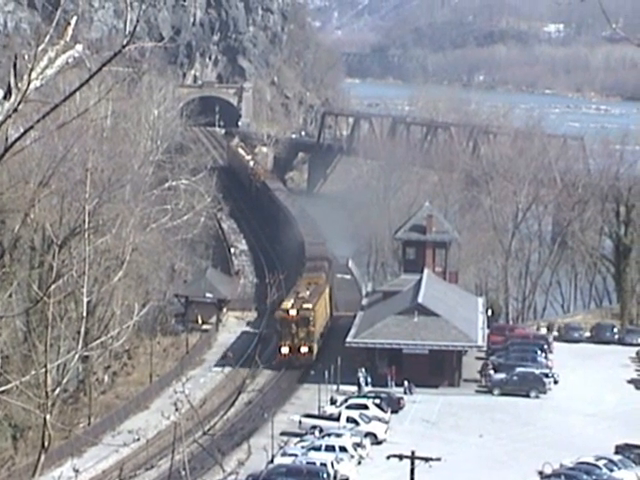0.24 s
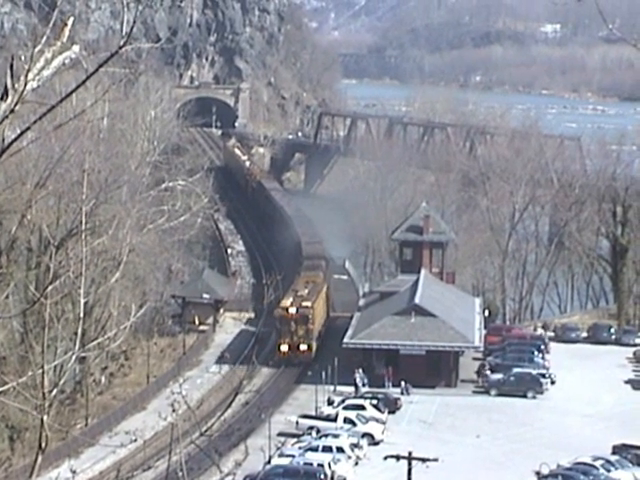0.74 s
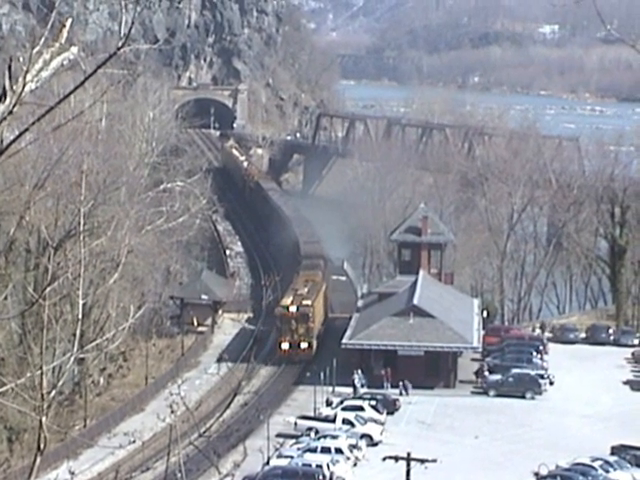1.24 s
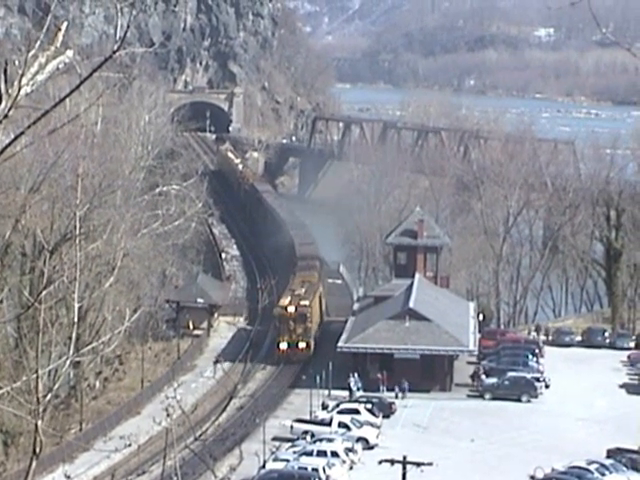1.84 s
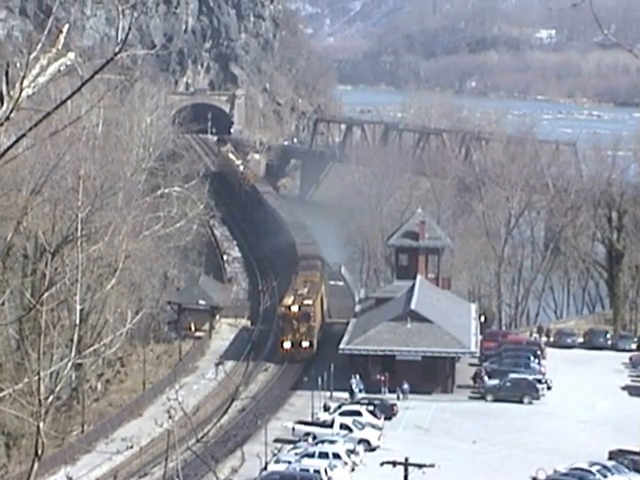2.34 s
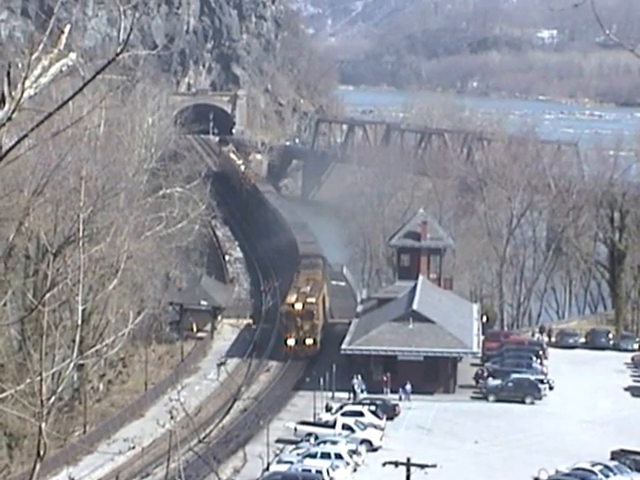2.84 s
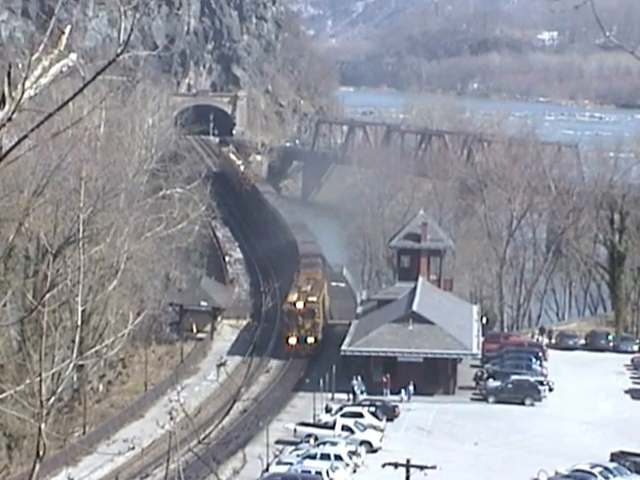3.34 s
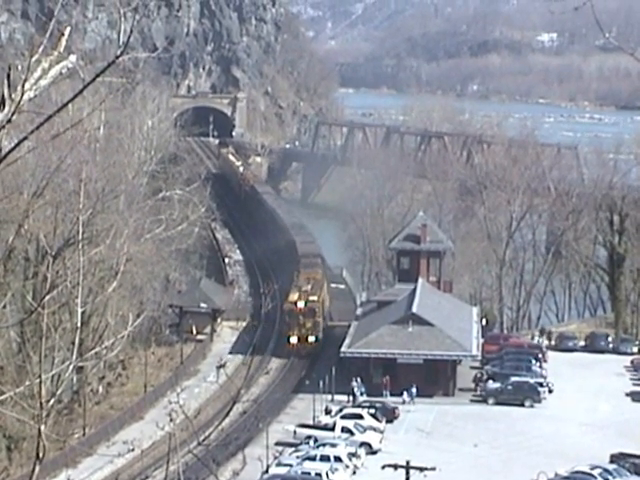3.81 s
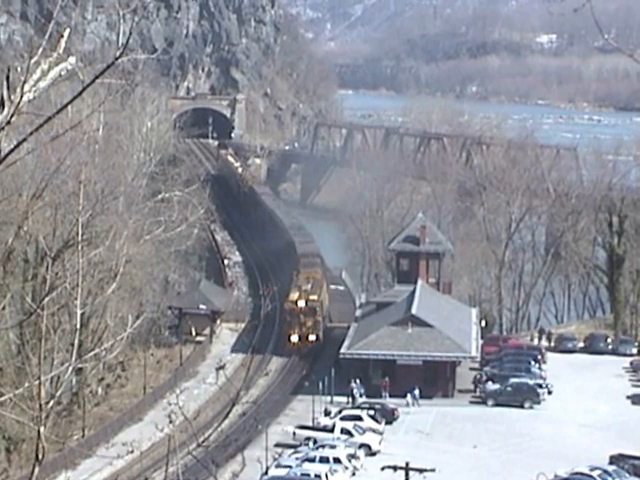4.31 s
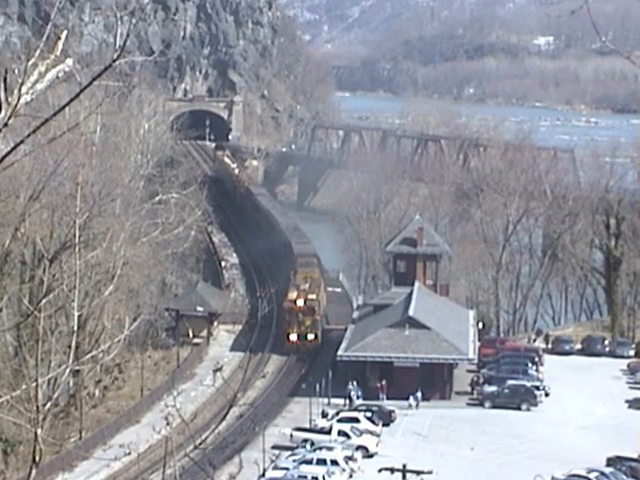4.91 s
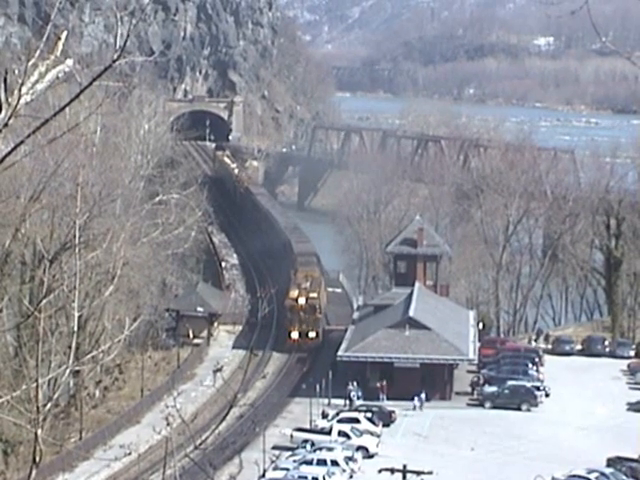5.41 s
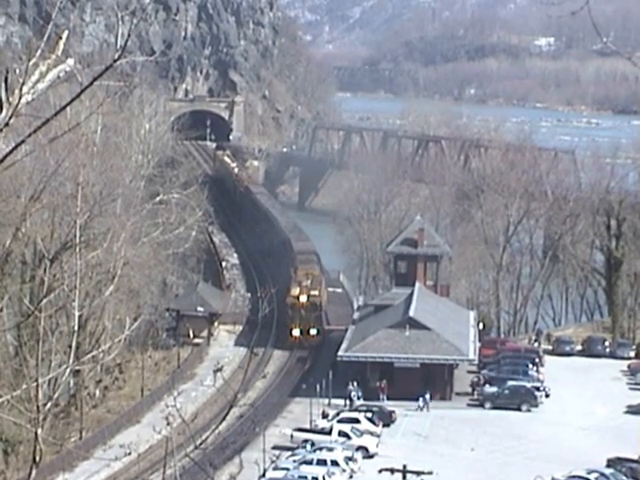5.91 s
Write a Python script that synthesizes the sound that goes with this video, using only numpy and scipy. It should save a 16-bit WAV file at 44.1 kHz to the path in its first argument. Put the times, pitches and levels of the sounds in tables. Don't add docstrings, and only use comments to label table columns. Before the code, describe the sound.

A continuous deep hum and rushing roar from a heavy train far below, slightly left of centre in the low end, swelling gently with the wind. A thin, constant high whine and hissy mechanism noise come from the camera itself, with sparse tiny clicks. Just before three seconds comes a crisp leaf scrape, then light gusts and short whistled bird chirps; the engine tones soften toward the end.

```python
import sys
import numpy as np
from scipy import signal
from scipy.fft import irfft
from scipy.io import wavfile

SR = 44100
rng = np.random.default_rng(int(sys.argv[2]) if len(sys.argv) > 2 else 0)


def elevation(decibels):
    levels = np.asarray(decibels, float)
    return 10 ** (levels / 20)


def digitize_waveform(pressure):
    field = np.atleast_2d(pressure).T
    bounded = np.clip(field, -1, 1)
    quanta = np.round(bounded * 32767).astype(np.int16)
    wavfile.write(sys.argv[1], SR, quanta)


N = 271215

# (frequency [Hz], left-right likeness [-1..1], left-right balance [dB])
STEREO_IMAGE = [(60, 0.97, 4.0), (300, 1, 4), (700, 0.94, 2.5), (1400, 0.96, 1.8), (3000, 0.99, -1),
                (6000, 0.29, 2.5), (15000, .05, -1.5)]


def in_time(rows):
    s, *columns = np.transpose(rows)
    return [np.interp(np.arange(N) / SR, s, c) for c in columns]


def at_hz(points, hz, column=1):
    points = np.array(points)
    return np.interp(np.log(hz), np.log(points[:, 0]), points[:, column])


def rms_one(x):
    return x / np.sqrt(np.mean(x ** 2) + 1e-20)


def drift(rate):
    step = 40
    r = np.exp(-2 * np.pi * step * rate / SR)
    white = rng.standard_normal(N // step + 4002)
    slow = signal.lfilter([1], [1, -2 * r, r * r], white)[4000:]
    return np.interp(np.arange(N) / step, np.arange(len(slow)), rms_one(slow - slow.mean()))


def bumps(rows):
    t, total = np.arange(N) / SR, 0
    for row in rows:
        peak, rise, fall, height = row[0], row[1], row[-2], row[-1]
        ramp = np.interp(t, [peak - rise, peak, peak + fall], [0, 1, 0])
        total = total + height * np.sin(np.pi / 2 * ramp) ** 2
    return total


def pan(x, lr_db, sign=1):
    return np.array([elevation(lr_db / 2) * x, sign * elevation(-lr_db / 2) * x])


def resonance(x, hz, width):
    r = np.exp(-np.pi * width / SR)
    return signal.lfilter([1, 0, -1], [1, -2 * r * np.cos(2 * np.pi * hz / SR), r * r], x)


def banded_noise(spectrum, first_hz, patchy_db, tilt_db, alike_share):
    edges = first_hz * 2 ** np.arange(0, np.log2(.42 * SR / first_hz), .5)
    opposite = np.array([[1], [-1]])
    out, together, white = 0, drift(8.4), rng.standard_normal((2, 2, N + SR))
    for k, (low, high) in enumerate(zip(edges, edges[1:])):
        band = signal.butter(2, [low, high], "band", fs=SR, output="sos")
        mid, side = signal.sosfilt(band, white[k % 2])[:, SR:]
        hz = np.sqrt(low * high)
        alike = np.clip(alike_share * at_hz(STEREO_IMAGE, hz), -1, 1)
        flicker_db = patchy_db * (1.7 * together + drift(9))
        gain = elevation(at_hz(spectrum, hz) + tilt_db * np.log2(hz / 1400) + flicker_db)
        lean = elevation(at_hz(STEREO_IMAGE, hz, column=2) / 2 * opposite)
        out = out + gain * lean * (np.sqrt(1 + alike) * mid + np.sqrt(1 - alike) * side * opposite)
    return rms_one(out)


def hiss():
    # (frequency [Hz], density [dB per Hz])
    hiss_spectrum = [(1500, -12), (3000, 7.5), (5000, -3), (8000, -5), (11000, -7.5), (15500, -8.5)]
    # (peak time [s], rise [s], fall [s], height [dB])
    gusts = [
        (2.8, 0.38, .4, 2.5),
        (3.45, 0.47, .5, 4),
        (4.45, 0.53, .17, 3.5),
    ]
    noise = banded_noise(hiss_spectrum, 1340.0, patchy_db=-0.1, tilt_db=0, alike_share=0.83)
    return elevation(-57 + bumps(gusts)) * noise


def rustles():
    # (time [s], length [s], lowest frequency [Hz], level [dB])
    bursts = [
        (2.695, .025, 4600, -58),
        (2.752, .014, 4200, -54),
        (2.772, .012, 3800, -53),
        (2.784, .02, 3800, -52),
        (2.81, .025, 6000, -58),
        (2.843, .016, 4500, -53),
    ]
    out, top_hz, size = np.zeros((2, N)), 8600, 4410
    for s, length, low_hz, level_db in bursts:
        grains = rng.standard_normal((2, size)) * elevation(3 * rng.standard_normal(size))
        band = signal.butter(3, [low_hz, top_hz], "band", fs=SR, output="sos")
        grains = signal.sosfilt(band, grains)
        shape = np.sin(np.pi * np.clip(np.arange(size) / SR / length, 0, 1))
        start = round(s * SR)
        out[:, start:start + size] += elevation(level_db) * rms_one(grains) * shape
    return out


def birds():
    # (time [s], length [s], pitch [Hz], drop into the pitch [Hz], level [dB])
    calls = [
        (2.70, 0.02, 5100, 50, -54.5),
        (3.216, 0.085, 7350, 800, -50.5),
        (3.585, 0.08, 7430, 0, -55),
        (3.675, .025, 7450, 50, -61),
        (3.745, .065, 5420, 30, -60.5),
        (3.782, 0.045, 3620, 50, -56.5),
        (5.115, 0.037, 3050, 0, -57),
    ]
    drop_s, attack_s, release_share = .005, .008, .75
    trill_per_s, trill_hz, trill_depth = 62, 140, .7
    out, size = np.zeros((2, N)), 8820
    t = np.arange(size) / SR
    echo_decay = .035 * np.exp(-np.arange(2600) / SR / 0.035)
    for s, length, end_hz, drop_hz, level_db in calls:
        trill = 2 * np.pi * trill_per_s * rng.uniform(0.7, 1.5) * t
        hz = end_hz + drop_hz * np.exp(-t / drop_s) + trill_hz * np.sin(trill)
        attack = np.clip(t / attack_s, 0, 1)
        release = np.clip((length - t) / (release_share * length), 0, 1)
        whistle = np.sin(2 * np.pi * np.cumsum(hz) / SR)
        call = attack * release * (1 + trill_depth * np.cos(trill)) * whistle
        start = round(s * SR)
        for side in (0, 1):
            echoes = rng.standard_normal(2600) * echo_decay
            echoes[2 * side] = 1
            out[side, start:start + size] += elevation(level_db) * signal.fftconvolve(call, echoes)[:size]
    return out


def ticks():
    # (time [s], peak [dB], left-right balance [dB])
    cracks = [(0.8839, -44, -1.5), (1.3603, -44, -2.0), (2.4728, -45, -1.0), (2.6294, -44, -0.5),
              (2.6894, -43, -0.5), (2.7561, -43, -1.0), (2.7751, -40, -0.5), (2.7894, -42, -0.5),
              (2.8479, -42, -1.0), (3.1073, -43, -1.0), (4.568, -41, -1.5), (5.2435, -42, -1.5),
              (5.79, -46, -1)]
    out, size = np.zeros((2, N)), 200
    fade = np.exp(-np.arange(size) / SR / .0008)
    band = signal.butter(3, [2200, 6000], "band", fs=SR, output="sos")
    for s, peak_db, lr_db in cracks:
        splinters = rng.standard_normal(size) + .6 * rng.standard_normal((2, size))
        crack = signal.sosfilt(band, fade * splinters)
        crack = crack / np.abs(crack).max() * pan(np.ones(1), lr_db)
        start = round(s * SR)
        out[:, start:start + size] += elevation(peak_db + 4.5) * crack
    return out


def drive_whine():
    # (centre [Hz], spacing [Hz], side tones each way [count], level [dB], left-right balance [dB])
    families = [(3016.5, 111.8, 3, -67, 1), (3167.4, 158.37, 3, -74, 2), (4156.8, 111.2, 1, -72, 0),
                (4220, 0, 0, -76, 2), (4544, 48.5, 1, -77, 2), (6454.8, 223.5, 3, -71, -9),
                (6343, 223.5, 3, -79, -9), (6395, 111.2, 1, -76, -9), (6493.5, 158.4, 4, -72, -9),
                (6810, 26.5, 1, -79, -8), (6651.5, 28, 1, -80, -8)]
    side_loss = {111.8: 1.8, 223.5: 2.8, 158.4: 2.2}
    t, out = np.arange(N) / SR, 0
    for centre_hz, spacing, count, db, lr_db in families:
        for k in range(-count, count + 1):
            level_db = db - abs(k) * side_loss.get(spacing, 0)
            angle = 2 * np.pi * (centre_hz + k * spacing) * t + 1.5 * drift(4)
            height = np.sqrt(2) * elevation(level_db - 1.5 + 1.5 * drift(4))
            lag = rng.uniform(1.2, 2.4) * np.array([[0], [1]])
            out = out + height * np.sin(angle + lag) * pan(np.ones(1), lr_db)
    return out


def drum_in_housing():
    # (frequency [Hz], width [Hz])
    modes = [(2500, 200), (3350, 500), (4100, 300), (5000, 900), (6400, 600), (7400, 350), (8400, 1200),
             (9850, 280), (11000, 1200), (13300, 2500)]
    # (bearing noise [dB], drum comb [dB], left-right balance [dB], left-right sign [clipped to
    mode_levels = [(-67, -81, -8.5, -1.1), (-68, -78, 4, -0.69), (-67, -66.5, -0.5, -1),
                   (-76, -71, 0, -1.3), (-72.5, -76, -7, -1.2), (-69.5, -76.5, -10.5, 0.091),
                   (-72.5, -77.5, -1, -1.1), (-75, -75, -3.5, -1.2), (-76, -72, 5, -0.33),
                   (-87.5, -75, 2, -.3)]
    drum_hz, out = 74.93, 0
    lines = elevation(3 * rng.standard_normal(206)) * np.exp(2j * np.pi * rng.random(206))
    pattern = irfft(lines, n=16384)
    drum = pattern[(drum_hz * (np.arange(N) / SR) % 1 * len(pattern)).astype(int)]
    for (hz, width), (noise_db, comb_db, lr_db, sign) in zip(modes, mode_levels):
        noise = rng.standard_normal((2, N))
        noise[1] = 0.74 * np.clip(sign, -1, 1) * noise[0] + 0.58 * noise[1]
        bearing = rms_one(resonance(resonance(noise, hz, width), hz, width)) * pan(np.ones(1), lr_db)
        ringing = rms_one(resonance(resonance(drum, hz, width), hz, width))
        comb = pan(ringing, lr_db, .3 * np.sign(sign))
        out = out + elevation(noise_db + 1.5 * drift(8)) * bearing + elevation(comb_db) * comb
    return out


def screened():
    from_s, to_s = 2.83, 5.24
    return np.sin(np.pi / 2 * np.interp(np.arange(N) / SR, [from_s, to_s], [0, 1])) ** 2


def roar():
    # (frequency [Hz], density [dB per Hz])
    roar_spectrum = [(25, -22), (42, -10.5), (56, -11), (90, 0), (150, -4), (200, -1.5), (270, 5),
                     (370, -6.5), (650, -1.5), (850, -8.5), (1100, -11.5), (2000, -18), (2500, -29.5),
                     (3500, -35.5), (5000, -54.5), (8000, -49)]
    # (time [s], level [dB])
    carry = [(0, -1.4), (.6, -1), (1.4, 0.3), (2.0, 1.8), (2.3, 0), (2.8, 1), (3.2, -0.8), (3.6, -0.2),
             (4.3, 0.8), (5.3, -0.15), (6.15, 0.1)]
    level_db = in_time(carry)[0] - 3 * screened()
    tilt_db = 0.3638 * level_db + 0.25
    far = banded_noise(roar_spectrum, 22.31, patchy_db=0.37, tilt_db=tilt_db, alike_share=0.94)
    air = signal.butter(4, 7000, fs=SR, output="sos")
    return elevation(level_db - 29) * signal.sosfilt(air, far)


def engine():
    strong_orders = {7: (-27, 3.8), 8: (-26.5, 0.48), 24: (-26, 3.9), 48: (-25.5, 9.8)}
    faint_orders = {6: -48, 9: -49, 12: -44, 16: -49, 32: -57, 36: -56, 42: -53, 72: -63, 96: -59.5, 117:
                    -61, 156: -66}
    fades = {7: [(0, 0.079, 1), (2.2, 0.66, 1.5), (5.5, 0.13, 6)], 8: [(.83, 0.18, 2.5), (4.2, 0.2, 0.5)],
             24: [(0, 0.26, 4.5), (.3, 0.15, 10.5), (.62, 0.41, 7.5), (1.7, 0.064, 2.5), (2.35, 0.67, 2),
             (3.13, 0.14, 9), (3.65, 0.35, 5.5), (4.05, 0.3, 4.5), (4.75, 0.23, 9), (5.2, 0.098, 3),
             (5.97, 0.073, 7), (6.15, .1, 14)], 48: [(0, 0.12, 7.5), (.4, 0.4, 3), (1.15, 0.44, 3.5),
             (2.1, 0.88, 2), (3.2, 0.45, 1.5), (3.6, .14, 0), (4.3, 0.22, 2), (4.7, 0.097, -2),
             (5.45, 0.089, -2.5)]}
    shaft_hz, wander_m, sound_speed = 14.8435, 0.049, 343
    flutter_per_order, flutter_hz, screen_flutter = .0052, 9, .6
    turn = 2 * np.pi * shaft_hz * (np.arange(N) / SR + wander_m * drift(1.0) / sound_speed)
    hidden, out, levels = screened(), 0, []
    for order, (db, loss_db) in strong_orders.items():
        levels.append((order, db - loss_db * hidden - bumps(fades[order])))
    for order, level_db in levels + list(faint_orders.items()):
        depth = flutter_per_order * (1 + screen_flutter * hidden) * order / (1 + order / 90)
        flutter = 1 + depth * (drift(flutter_hz) + 1j * drift(flutter_hz))
        tone = np.sqrt(2) * elevation(level_db) * np.imag(flutter * np.exp(1j * order * turn))
        out = out + pan(tone, at_hz(STEREO_IMAGE, order * shaft_hz, column=2))
    return out


def capsules(far):
    left = signal.lfilter([0, 1], [1], far[0])
    right = signal.lfilter(*signal.butter(1, 20, "high", fs=SR), far[1])
    return np.array([left, right])


def scene():
    near = hiss() + rustles() + birds() + ticks() + drive_whine() + drum_in_housing()
    return near + capsules(roar() + engine())


def low_pass(x):
    return signal.sosfilt(signal.butter(12, 15730, fs=SR, output="sos"), x)


def record(dry):
    cut = signal.ellip(14, .5, 60, 15420, fs=SR, output="sos")
    mix = signal.sosfilt(cut, dry)
    return low_pass(mix)


dry = scene()
out = record(dry)
digitize_waveform(out)
```